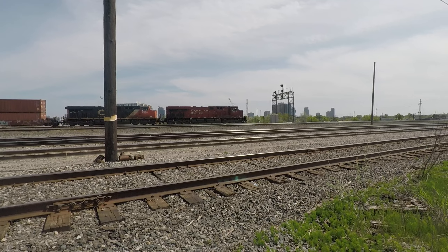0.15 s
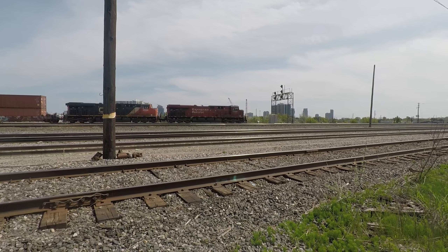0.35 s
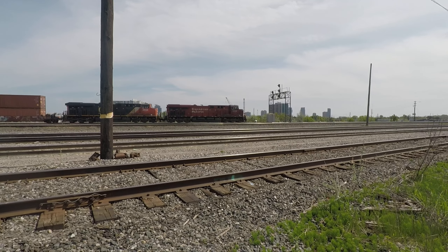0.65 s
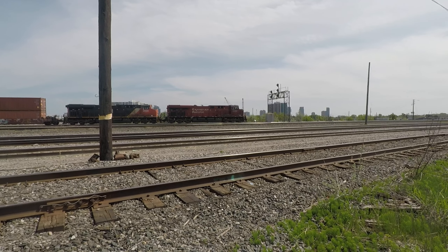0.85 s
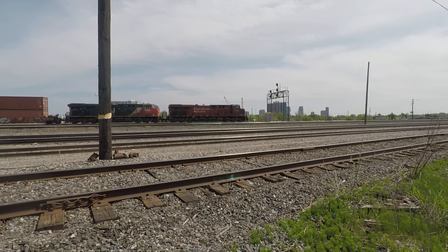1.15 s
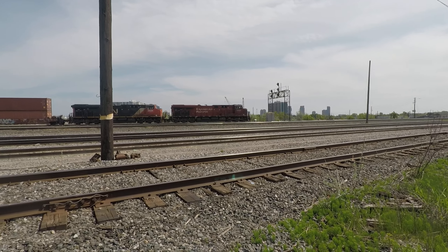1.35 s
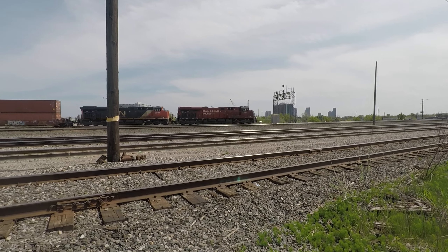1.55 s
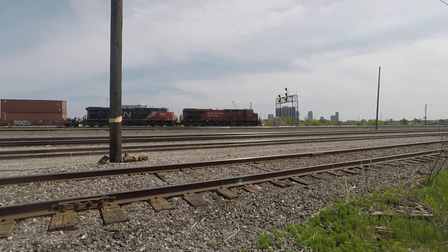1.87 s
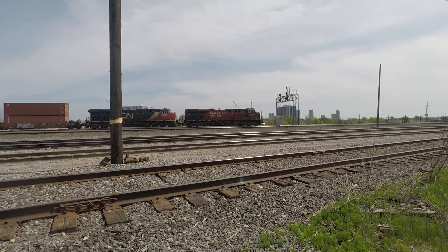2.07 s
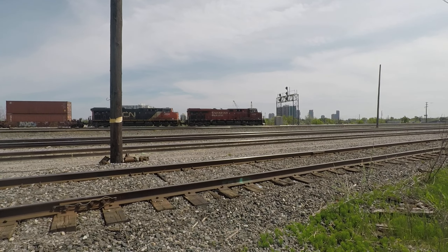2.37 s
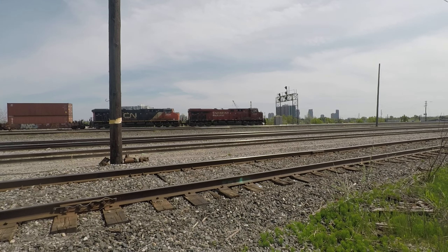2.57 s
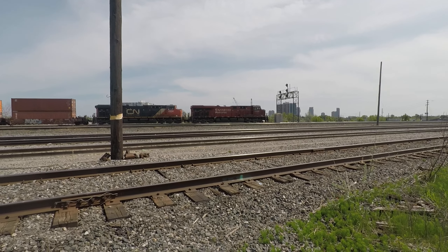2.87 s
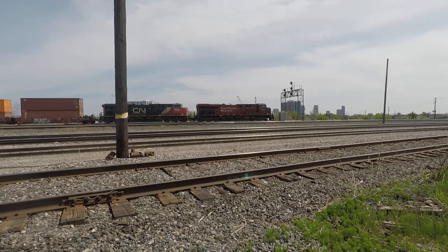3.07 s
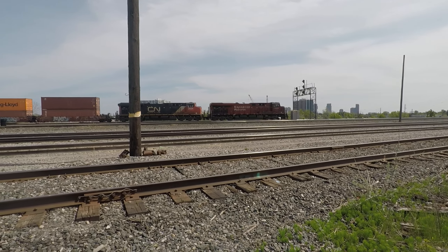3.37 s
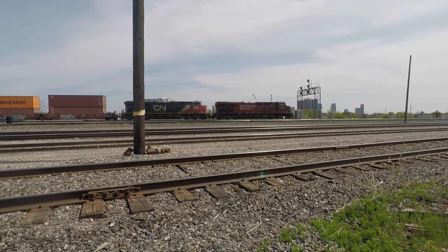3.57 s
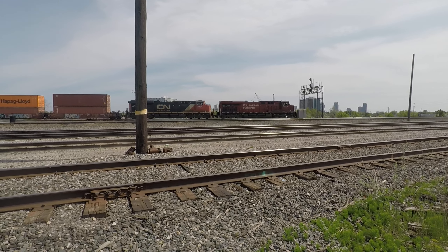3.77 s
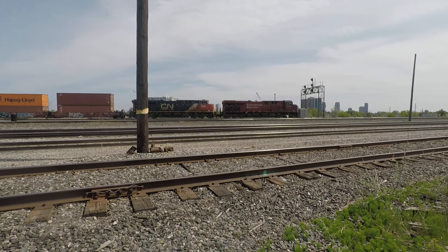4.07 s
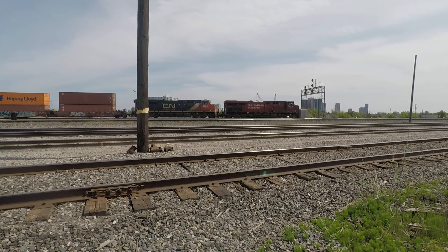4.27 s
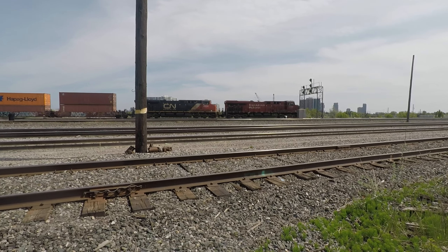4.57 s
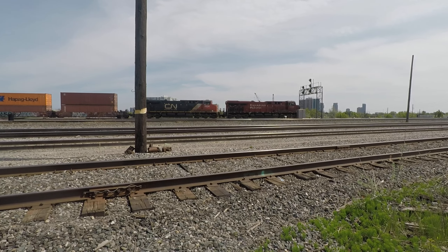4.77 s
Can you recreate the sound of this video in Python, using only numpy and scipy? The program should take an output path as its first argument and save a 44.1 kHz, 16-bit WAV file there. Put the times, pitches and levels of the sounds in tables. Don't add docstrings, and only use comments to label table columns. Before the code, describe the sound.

A distant freight train heard outdoors through a small stereo microphone without wind protection: deep, continuous, uneven diesel throbbing, low rolling rumble, and a breathy rush that swells and thins with the moving air. Faint high tones flutter. Light low thumps of wind come early and midway, followed by a tiny burst of crisp stem snaps, then heavy lumpy gusts, mostly left, in the last half second.

```python
import sys
import numpy as np
from scipy import signal
from scipy.fft import rfft, irfft
from scipy.io import wavfile
from scipy.ndimage import uniform_filter1d, minimum_filter1d

SR = 44100
rng = np.random.default_rng(int(sys.argv[2]) if len(sys.argv) > 2 else 0)


def digitize_waveform(pressure):
    field = np.atleast_2d(pressure).T
    bounded = np.clip(field, -1, 1)
    quanta = np.round(bounded * 32767).astype(np.int16)
    wavfile.write(sys.argv[1], SR, quanta)


def ratio_of_db(decibels):
    return 10 ** (np.asarray(decibels, float) / 20)


N = 217272
TIME = np.arange(N) / SR
EAR_SIGN = np.array([[.5], [-.5]])


def read(points, hz):
    f, value = np.transpose(points)
    return np.interp(np.log(hz + 30), np.log(f + 30), value)


def evened(x):
    return x / np.sqrt(np.mean(x ** 2) + 1e-20)


def wander(top_hz):
    t = TIME[::64]
    slow = sum(np.sin(2 * np.pi * (f * t + rng.random())) / np.sqrt(f) for f in np.geomspace(.2, top_hz, 24))
    return evened(np.repeat(slow, 64)[:N])


LAYER_LEVELS = {"rumble": (-34, -0.25, 0., 0., 1.5), "roar": (-38, 1.03, 0.06, 0., 0.26),
                "blower": (-40, 0.9, 0.24, 0.5, 1.), "hiss": (-52.5, .5, 1., 0, -0.23),
                "sizzle": (-51.5, 0.32, 0.58, 0.76, 0.05)}
# time of the top in seconds, lift in dB,
# brightness in dB, rise in seconds, fall in seconds.
AIR_LIFTS = [
    (.15, 7, -3, 0.25, 0.48),
    (1.05, 5, 1.5, 0.19, 0.59),
    (2.25, 2.5, -1, 0.17, 0.35),
    (2.75, 3.5, 0.9, 0.14, .7),
    (4.5, 2.5, .3, 0.26, 0.72),
]
# time in seconds, surge in dB.
BLOWER_SURGES = [(.19, 4), (.61, 6.5), (.8, 4.5), (1.2, 0.5), (1.85, 4.5), (2.7, 2.5), (3.08, 5.5),
                 (4.34, 5.5), (4.54, 8)]


def level(layer):
    db, fade_db, lifted, brightened, surged = LAYER_LEVELS[layer]
    total_db = db - fade_db * TIME
    for s, up_db, bright_db, rise, fall in AIR_LIFTS:
        bump = np.exp(-((TIME - s) / np.where(TIME < s, rise, fall)) ** 2)
        total_db += (lifted * up_db + brightened * bright_db) * bump
    for s, up_db in BLOWER_SURGES:
        total_db += surged * up_db * np.exp(-((TIME - s) / 0.029) ** 2)
    return ratio_of_db(total_db)


# frequency in Hz, share of the noise in common.
PORT_COHERENCE = [(60, 1), (130, 0.89), (260, 1), (550, 0.55), (1150, 0.37), (1550, 0.54), (1890, 1),
                  (2240, 0.45), (2600, 0.68), (3600, 1), (4700, 1), (5600, 0.7), (6400, 0.41), (7800, 0.43)]
# frequency in Hz, left minus right in dB.
PORT_LEAN = [(60, 1), (300, -1), (550, 4), (860, 1), (1200, -1.5), (1500, -2.5), (1890, 0.3), (2240, 6),
             (2600, -5), (3300, -1.5), (4300, 1), (5300, -1.5), (6200, 5.5), (7800, -1.5)]
# frequency in Hz, left ahead of right in radians.
PORT_LEAD = [(0, 0.24), (600, 0.19), (1210, -1.1), (1550, 0.22), (1810, -1), (2070, 1), (2410, -0.7),
             (3270, -0.48), (4820, -0.87), (5430, 1), (5860, 0.18), (6200, 0.52), (6550, -0.11),
             (7490, 0.0)]


def air(colour_db, patchy_db, size=1024):
    hop, hz = size // 4, np.fft.rfftfreq(size, 1 / SR)
    a, b, c, d, patches = rng.standard_normal((N // hop + 5, len(hz), 5)).T
    patches = uniform_filter1d(patches, size=14, axis=0)
    patches = evened(uniform_filter1d(patches, size=16, axis=1))
    same = np.clip(read(PORT_COHERENCE, hz), 0, 1)[:, None]
    left = a + 1j * b
    right = same * left + np.sqrt(1 - same ** 2) * (c + 1j * d)
    tilt = (ratio_of_db(read(PORT_LEAN, hz) / 2) * np.exp(.5j * read(PORT_LEAD, hz)))[:, None]
    colour = ratio_of_db(colour_db(hz)[:, None] + patchy_db * patches)
    spectra = np.array([left * tilt, right / tilt]) * colour
    x = signal.istft(spectra, nperseg=size, noverlap=size - hop)[1][:, :N]
    return x / np.sqrt(np.mean(x.mean(0) ** 2))


CRANK_RATES = [
    (4.82672, .00046746),
    (4.84332, -.00121495),
]


def cycles(engine):
    rate, drift = CRANK_RATES[engine]
    return rate * TIME + drift * TIME ** 2


def chuff(depth, slip):
    beat = 0
    for engine in (0, 1):
        turned = cycles(engine)
        beat = beat + np.cos(2 * np.pi * (6 * turned + slip)) + .6 * np.cos(2 * np.pi * turned)
    return 1 + depth * beat


# frequency in Hz, density in dB per Hz.
RUMBLE_COLOUR = [(15, -13), (40, -12), (60, -7), (75, -4), (100, -5), (120, -9), (165, -9), (220, -12),
                 (320, -28)]


def rumble():
    noise = air(lambda hz: read(RUMBLE_COLOUR, hz) - 40 * (hz > 400), 2.5, size=4096)
    return level("rumble") * ratio_of_db(wander(14)) * noise


# frequency in Hz, density in dB per Hz.
ROAR_COLOUR = [(110, -28.5), (180, -2.5), (200, -13), (302, -14.5), (378, -24.5), (465, -20.5), (516, -26),
               (616, -20), (664, -22.5), (817, -19), (986, -23), (1240, -19), (1370, -27), (1560, -32),
               (1700, -19.5), (2210, -41.5), (3740, -120)]


def fan_roar():
    noise = air(lambda hz: read(ROAR_COLOUR, hz), 0.8)
    return ratio_of_db(4.5) * level("roar") * noise * chuff(0.016, 0.19)


# frequency in Hz, width in Hz, level in dB.
BLOWER_BANDS = [(1798, 308, 0.5), (1487, 130, -10.5)]


def blower():
    def whoosh_db(hz):
        return 20 * np.log10(sum(ratio_of_db(db) / (1 + (2 * (hz - f) / w) ** 4) for f, w, db in BLOWER_BANDS))
    return ratio_of_db(-0.5) * level("blower") * air(whoosh_db, 0.49) * chuff(0.039, .3)


# frequency in Hz, density in dB per Hz.
HISS_COLOUR = [(1240, -25), (2100, 2), (2220, -9), (2480, 2), (2740, -4), (3100, 0), (3370, -3.5),
               (3600, -2), (4000, -7), (5200, -35.5), (8800, -120)]


def valve_hiss():
    noise = air(lambda hz: read(HISS_COLOUR, hz), 1.2)
    return ratio_of_db(1.54) * level("hiss") * noise * chuff(0.049, .3)


# frequency in Hz, density in dB per Hz.
SIZZLE_COLOUR = [(2350, -31.5), (4000, -2), (4310, 0), (5530, -6), (6100, -4), (7490, -10.5), (7760, -13.5),
                 (10100, -42.5), (17100, -120)]


def valve_sizzle():
    noise = air(lambda hz: read(SIZZLE_COLOUR, hz), 1.0)
    return ratio_of_db(0.68) * level("sizzle") * noise * chuff(0.055, 0.38)


# frequency in Hz, level in dB rms, waver in Hz,
# flutter in dB, fade in dB per second.
WHINE_TONES = [(341, -50, 2., 3., 1.5), (462, -50.5, .8, 1.2, 1.8), (612, -55, 2., 2., 1.5),
               (625, -53, 2., 2., 1.5), (806, -57, 6., 3., 2.), (2442, -67, 15., 3., 3.),
               (3565, -65, 20., 3., 5.), (7312, -77, 4., 3., .1)]


def whines():
    out = np.zeros((2, N))
    for hz, db, waver, flutter_db, fade_db in WHINE_TONES:
        phase = 2 * np.pi * np.cumsum(hz + waver * wander(30)) / SR
        tone_db = db + flutter_db * wander(14) - fade_db * TIME
        out += np.sqrt(2) * np.sin(phase) * ratio_of_db(tone_db + read(PORT_LEAN, hz) * EAR_SIGN)
    return out


# time in seconds, length in seconds, left level in dB, right level in dB,
# top frequency in Hz.
GUST_EVENTS = [(1.118, 0.02, -36, -25, 420), (1.729, 0.015, -53.5, -41.5, 300), (2.94, .05, -35, -44, 300),
               (2.968, 0.035, -29, -40, 470), (3.21, 0.037, -36, -38, 252), (3.37, 0.025, -47, -40, 199),
               (3.452, 0.047, -28, -31, 216), (4.407, .07, -31, -54, 220), (4.468, 0.04, -32, -31.5, 650),
               (4.55, 0.039, -25.5, -19.5, 674), (4.593, 0.025, -20, -45, 300),
               (4.663, 0.079, -26.5, -42, 397), (4.693, 0.05, -21.5, -29, 520),
               (4.728, 0.057, -18.5, -24, 740), (4.77, 0.056, -21, -29.5, 600),
               (4.794, 0.022, -35, -25.5, 560), (4.903, 0.035, -38, -40, 247)]


def gusts():
    out = np.zeros((2, N + SR))
    t = (np.arange(8192) - 4096) / SR
    for s, length, left_db, right_db, top_hz in GUST_EVENTS:
        lumps = rng.standard_normal((2, 8192)) * (rng.random((2, 8192)) < .025)
        lumps[1] = .7 * lumps[1] - .7 * lumps[0]
        band = signal.butter(4, [110, top_hz], "band", fs=SR, output="sos")
        push = signal.sosfilt(band, signal.lfilter([1], [1, -.96], lumps))
        swell = np.exp(-(2.5 * t / length) ** 2)
        rms = np.sqrt((push ** 2 @ swell ** 2) / np.sum(swell ** 2))
        start = round(s * SR) - 4096
        out[:, start:start + 8192] += push / rms[:, None] * swell * ratio_of_db(np.array([[left_db], [right_db]]))
    return out[:, :N]


# time in seconds, peak level in dB, frequency in Hz, left minus right in dB.
WEED_TICKS = [
    (3.478, -42.5, 6620, 0.5),
    (3.4857, -29.5, 6940, 1.5),
    (3.5078, -42, 6600, 7.5),
    (3.553, -43, 5700, -3.5),
    (3.5868, -47, 6410, 2.5),
]


def ticks():
    out, t = np.zeros((2, N)), np.arange(400) / SR
    for s, db, hz, pan_db in WEED_TICKS:
        band = signal.butter(2, [.8 * hz, 1.25 * hz], "band", fs=SR, output="sos")
        decay = np.exp(-t / 0.00034) + 0.19 * np.exp(-t / 0.0024)
        snap = signal.sosfilt(band, rng.standard_normal(400) * decay)
        start = round(s * SR)
        out[:, start:start + 400] += snap / abs(snap).max() * ratio_of_db(db + pan_db * EAR_SIGN)
    return out


# lead engine strength in dB, its lag in firing intervals,
# second engine strength in dB, its lag in firing intervals.
CYLINDER_FIRINGS = [(-0.5, 0.114, -1.5, -0.158), (1.4, -0.042, -3.5, -0.244), (3.5, -0.034, 4.5, -0.4),
                    (-3, -0.091, -5.5, 0.51), (2, 0.166, 2.5, -0.211), (1.3, 0.031, -8, -0.3),
                    (2, -0.06, 3.5, -0.33), (-1.5, 0.692, -5, -0.377), (3, 0.066, 4, -0.117),
                    (1.3, -0.059, 1.6, -0.229), (0.85, -0.15, 7, -0.3206), (1, -0.372, 0.5, -0.318)]
# frequency in Hz,
# width in Hz, level in dB.
EXHAUST_MODES = [(30, 6.2, -40), (73.45, 11.34, -31), (91.8, 5.87, -25), (162.7, 22.2, -45),
                 (162.1, 3.7, -46), (115.2, 1.6, -51.5), (140.2, 27, -49), (59.8, 5.5, -47.5),
                 (187.5, 10, -58.5), (231.7, 8, -56), (300, 48, -66.5)]
# order, level in dB, lag in radians.
BLOCK_HUMS = [(34, -41.5, 0.1), (23, -48, 0.77), (26, -38.5, 0.24)]
# time in seconds, lead engine in dB, second engine in dB,
# orders above the ground dip in dB.
ROLL_PAST = [(0, 0.5, -1.5, 1.5), (.7, 2, 1, -1), (1.4, 1, 1.5, 1.5), (2.1, 1, 1.3, 0), (2.8, 1, 0.5, -5),
             (3.5, 0.7, 1.2, -4.5), (4.2, 1.5, -1.3, -3.5), (4.93, 0.4, -0.5, -2)]
CYCLE_HZ = 4.834
SECOND_AHEAD = .6925
MUFFLE_HZ, GROUND_DIP_HZ, NOTCH_HZ = 330, 118, 39


def exhaust(engine):
    strength_db, lag = np.array(CYLINDER_FIRINGS)[:, 2 * engine:2 * engine + 2].T
    order = np.arange(4, 90)
    hz = order * CYCLE_HZ
    when = (np.arange(len(lag)) + lag) / len(lag)
    firings = ratio_of_db(strength_db) @ np.exp(-2j * np.pi * np.outer(when, order))
    stack = 0
    for k, (f, width, db) in enumerate(EXHAUST_MODES):
        stack = stack + (-1) ** k * ratio_of_db(db) / (1 + 2j * (hz - f) / width)
    notch = 1 - .75 * np.exp(-((hz - NOTCH_HZ) / 5) ** 2)
    lines = np.zeros(4097, complex)
    lines[order] = firings * stack * notch / (1 + (hz / MUFFLE_HZ) ** 4)
    for k, db, late in BLOCK_HUMS:
        lines[round(k)] += ratio_of_db(db) * np.exp(2j * np.pi * round(k) * SECOND_AHEAD * engine - 1j * late)

    def play(part):
        one_cycle = irfft(lines * part) * 4096
        return np.interp(cycles(engine) % 1 * 8192, np.arange(8192), one_cycle, period=8192)
    upper = np.arange(4097) * CYCLE_HZ > GROUND_DIP_HZ
    s, *curves = np.transpose(ROLL_PAST)
    near = ratio_of_db(np.interp(TIME, s, curves[engine]))
    bright = ratio_of_db(np.interp(TIME, s, curves[2]))
    return near * (play(~upper) + bright * play(upper))


def scene():
    machinery = rumble() + fan_roar() + blower() + valve_hiss() + valve_sizzle()
    engines = (exhaust(0) + exhaust(1)) * ratio_of_db(-.9 * EAR_SIGN)
    return machinery + whines() + gusts() + ticks() + engines


def roll_off(x):
    return signal.sosfilt(signal.butter(12, 15700, fs=SR, output="sos"), x)


# frequency in Hz, density in dB per Hz.
MIC_COLOUR = [(4000, -18), (7500, -6), (9000, 4), (10500, -1), (11500, -7), (13000, -11), (15000, -17),
              (17000, -33.5)]
MIC_DB = [
    [-66.5],
    [-62.5],
]
LIMIT_DB, SQUEEZE = -5.5, 0.44


def record(dry):
    white = rfft(rng.standard_normal((2, N)))
    own = irfft(white * ratio_of_db(read(MIC_COLOUR, np.fft.rfftfreq(N, 1 / SR))), N)
    noisy = dry + ratio_of_db(np.array(MIC_DB)) * evened(own)
    peak = -minimum_filter1d(-abs(noisy).max(0), size=700)
    over_db = np.maximum(20 * np.log10(peak + 1e-9) - LIMIT_DB, 0)
    mix = noisy / ratio_of_db(SQUEEZE * uniform_filter1d(over_db, size=600))
    return roll_off(mix)


dry = scene()
out = record(dry)
digitize_waveform(out)
```